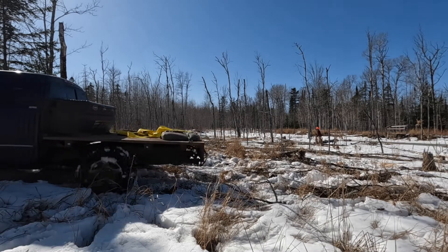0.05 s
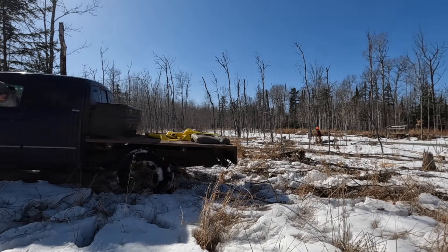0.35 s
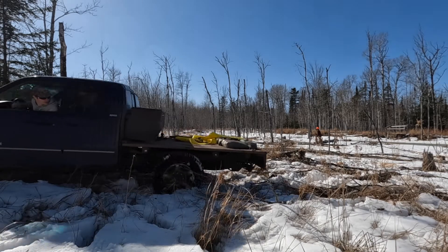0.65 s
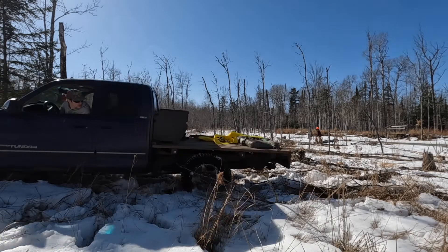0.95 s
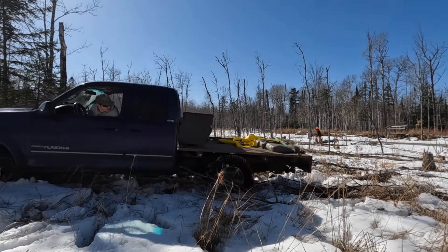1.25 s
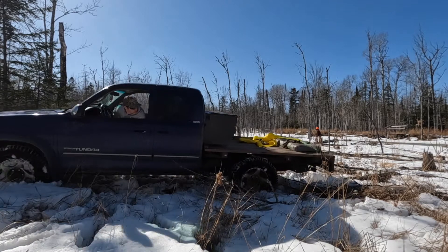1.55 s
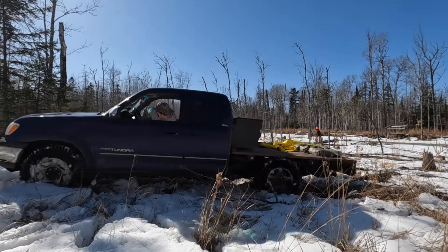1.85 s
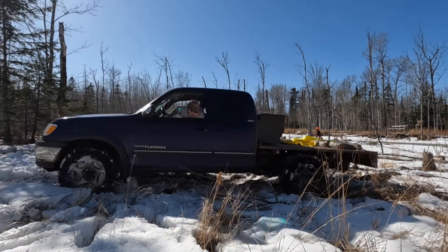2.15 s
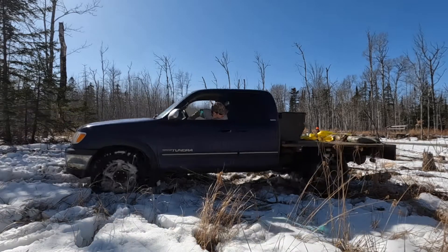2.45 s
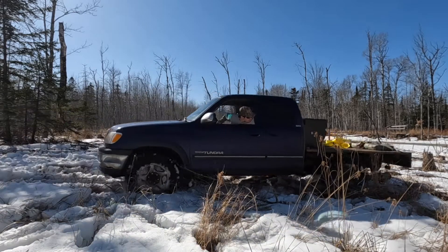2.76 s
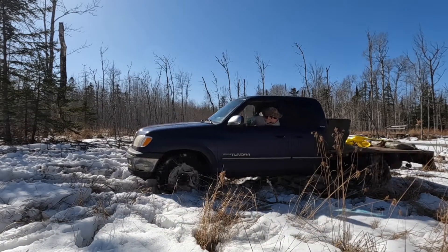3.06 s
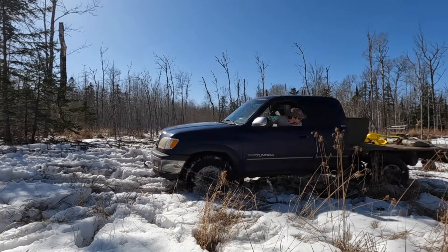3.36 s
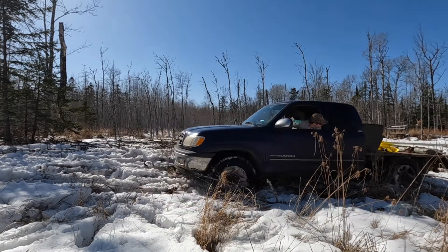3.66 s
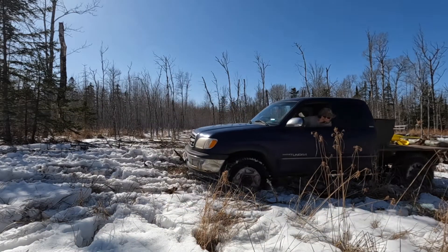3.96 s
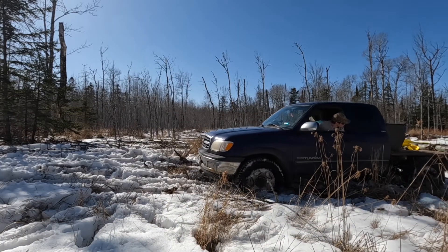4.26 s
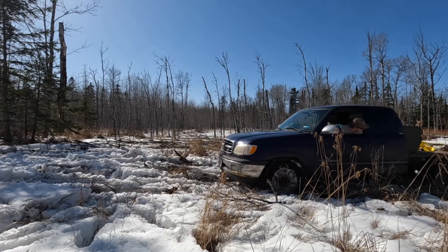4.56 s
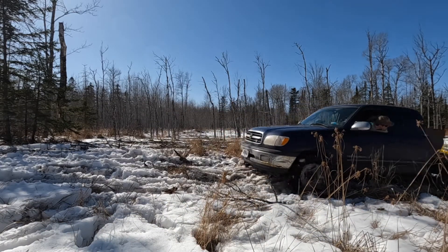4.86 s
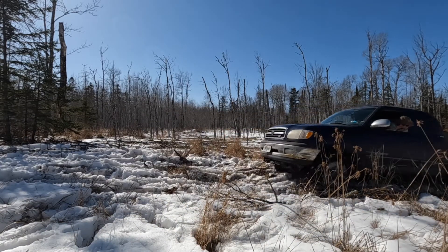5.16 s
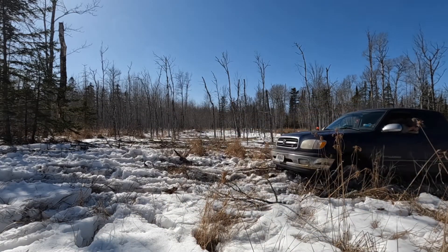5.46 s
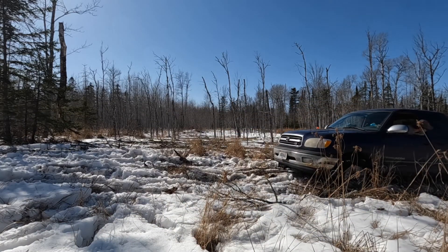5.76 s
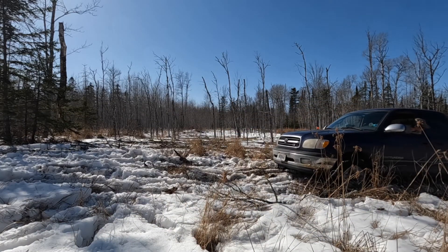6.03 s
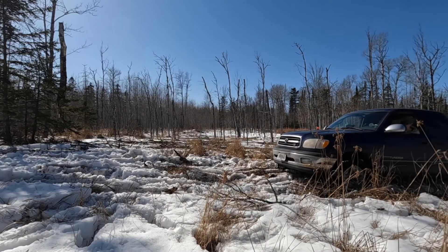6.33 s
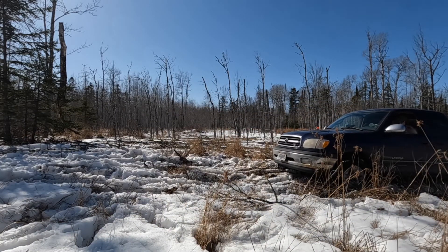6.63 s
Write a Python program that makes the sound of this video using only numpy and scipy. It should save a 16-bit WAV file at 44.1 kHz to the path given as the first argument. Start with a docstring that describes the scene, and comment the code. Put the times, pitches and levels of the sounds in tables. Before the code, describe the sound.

A pickup truck crawls past with a low engine hum, its tyres crunching crusted snow and snapping dead twigs and branches.

```python
"""A low exhaust hum, engine-bay hiss and tyres crunching crusted snow: a V8 pickup crawls past
over dead brush in an open clearing, then slows to a halt. Uneven cylinders roughen the hum and the
body rumbles. The crust crumbles in tiny fractures, the wheels thud into ruts, branches knock on a rim.
Loudest are snapping twigs and splintering buried limbs, whose tearing fibres ring the wood.
One dull bump sounds on the right near the end."""
import sys
import numpy as np
from scipy import signal
from scipy.fft import rfft, irfft, next_fast_len
from scipy.io import wavfile
from scipy.ndimage import uniform_filter1d

SR = 44100
rng = np.random.default_rng(int(sys.argv[2]) if len(sys.argv) > 2 else 0)


def dump_mix(stems):
    """Bounce the given channels to the path in sys.argv[1] as a 16-bit WAV at rate SR."""
    frames = np.atleast_2d(stems).T  # one column per channel
    limited = np.clip(frames, -1, 1)  # hard clip at full scale
    pcm = np.round(limited * 32767).astype(np.int16)
    wavfile.write(sys.argv[1], SR, pcm)


N = 303849


def from_db(db):
    """Decibels to gain."""
    return 10 ** (np.asarray(db) / 20)


def rms_one(x):
    """Scale to unit rms."""
    return x / np.sqrt(np.mean(x ** 2) + 1e-20)


def in_time(rows):
    """Each column after the time, interpolated per sample."""
    times, *columns = np.transpose(rows)
    return [np.interp(np.arange(N) / SR, times, column) for column in columns]


def at_hz(points, hz):
    """Read a spectrum on a log-frequency axis."""
    points_hz, values = np.transpose(points)
    return np.interp(np.log(hz + 1e-3), np.log(points_hz), values)


def drift(rate_hz):
    """Smooth random wander, unit rms."""
    step, warmup = 40, 2000
    pole = np.exp(-2 * np.pi * rate_hz * step / SR)
    noise = rng.standard_normal(N // step + warmup + 2)
    slow = signal.lfilter([1], [1, -2 * pole, pole * pole], noise)[warmup:]
    return np.interp(np.arange(N) / step, np.arange(len(slow)), rms_one(slow))


def band(x, low_hz, high_hz):
    """Causal band-pass."""
    sos = signal.butter(2, [low_hz, min(high_hz, .45 * SR)], "band", fs=SR, output="sos")
    return signal.sosfilt(sos, x)


def resonate(x, hz, width_hz):
    """One resonance, unit peak gain."""
    radius = np.exp(-np.pi * width_hz / SR)
    feedback = [1, -2 * radius * np.cos(2 * np.pi * hz / SR), radius ** 2]
    return signal.lfilter(np.array([1, 0, -1]) * (1 - radius ** 2) / 2, feedback, x)


def shape(x, gain_at):
    """Filter by a gain that is a function of frequency."""
    size = next_fast_len(N + SR // 2)
    return irfft(rfft(x, size) * gain_at(np.fft.rfftfreq(size, 1 / SR)), size)[..., :N]


def add(out, time_s, sound):
    """Mix in a short sound."""
    start = int(time_s * SR)
    out[..., start:start + sound.shape[-1]] += sound[..., :N - start]


def panned(x, left_db):
    """Pan by a left-minus-right level."""
    return x * from_db(left_db * np.array([[1], [-1]]) / 2)


# Stereo coherence: (frequency [Hz], left-right correlation [0..1])
COHERENCE = [(30, .9), (120, .94), (300, .98), (1000, .95), (2500, .85), (5000, .88), (8000, .85),
             (12000, .5)]


def spread(source, colour):
    """Colour a white source, roll off past the colour's ends, add a diffuse share; unit rms."""
    def gain(hz, sign):
        skirts = 1 / np.sqrt((1 + (hz / colour[-1][0]) ** 8) * (1 + (colour[0][0] / (hz + 1)) ** 4))
        return skirts * from_db(at_hz(colour, hz)) * np.sqrt(1 + sign * at_hz(COHERENCE, hz))
    mid = shape(source, lambda hz: gain(hz, 1))
    side = shape(rng.standard_normal(N), lambda hz: gain(hz, -1))
    return rms_one(np.array([mid + side, mid - side]))


# Engine run: (time [s], firing rate [Hz], firing tone level [dB])
ENGINE = [(0, 110.7, -33.5), (.55, 109.6, -32.5), (.72, 118.9, -34), (.92, 116.7, -36.5),
          (1.12, 130.6, -34.5), (1.42, 123.4, -34.5), (1.7, 133.9, -37), (2.1, 135.4, -38),
          (2.32, 141.5, -36.5), (3.1, 123, -39), (3.36, 114.2, -34.5), (3.52, 101.9, -35),
          (3.72, 106.7, -36), (3.95, 110, -34), (4.15, 111, -33.5), (4.35, 123.2, -28),
          (4.55, 130.4, -29.5), (4.78, 126.9, -30.5), (4.92, 112.5, -36), (5.4, 103.7, -37),
          (5.72, 112.3, -40.5), (5.92, 106, -31.5), (6.15, 109.2, -41.5), (6.3, 112, -36),
          (6.89, 109.8, -47.5)]
# Exhaust partials: (multiple of the eight-cylinder cycle rate, gain [dB])
EXHAUST = [(2, -4.5), (4, -2), (5, -9.5), (7, -5), (8, 0), (9, -16), (10, -11.5), (12, -19.5), (16, -29.5),
           (24, -26.5), (32, -40)]
# Engine-bay hiss, screened while broadside: (time [s], relative level [dB])
HISS = [(0, -43), (1.2, -41.5), (1.75, -48), (3.2, -53), (4.1, -95), (5.2, -53), (6.89, -52.5)]
# Hiss spectrum: (frequency [Hz], density [dB])
HISS_COLOUR = [(1200, -3), (2100, -4.5), (2700, -7), (3300, -6), (3700, 0), (3950, -2.5), (4290, -1.5),
               (4700, -2), (5200, -12.5)]
# Whistles in the hiss: (frequency [Hz], width [Hz], gain [dB])
WHISTLES = [(3660, 210, -12), (4295, 220, -8)]
# Whistle swell as the engine picks up: (time [s], gain [dB])
WHISTLE_SWELL = [(0, -4), (.75, -3), (1.08, 3.5), (1.5, -1), (1.8, -2), (6.89, -6)]
# Truck starts near the centre and drifts right: (time [s], left minus right before RIGHT_TILT [dB])
BEARING = [(0, 4.5), (1.5, 3), (2.4, 2.4), (4.1, 1), (5.5, 0.5), (6.5, 1)]


def engine(waver_db=3.5, hiss_pulse=0.21, whistle_pulse=0.13, hunting=0.01335):
    """Uneven cylinders put partials between the firing tones; hiss and whistles pulse twice a cycle."""
    firing_hz, level_db = in_time(ENGINE)
    cycle_rad = 2 * np.pi * np.cumsum(firing_hz * (1 + hunting * drift(12))) / SR / 8
    exhaust = sum(from_db(db + waver_db * drift(6.2)) * np.sin(k * cycle_rad + rng.uniform(0, 2 * np.pi))
                  for k, db in EXHAUST)
    pulse = np.sin(2 * cycle_rad)
    hiss = spread(rng.standard_normal(N) * (1 + hiss_pulse * pulse), HISS_COLOUR)
    whistles = np.zeros(N)
    for hz, width_hz, db in WHISTLES:
        narrow = resonate(rng.standard_normal(N), hz, width_hz)
        whistles += from_db(db) * rms_one(resonate(narrow, hz, width_hz))
    whistles *= from_db(in_time(WHISTLE_SWELL)[0]) * (1 + whistle_pulse * pulse)
    bay = from_db(in_time(HISS)[0] - 1.5) * (hiss + whistles)
    return from_db(level_db) * exhaust + panned(bay, in_time(BEARING)[0])


def hum(rows, waver_db, waver_hz, roughness, fade_s=0.13):
    """A rough, wavering low tone that fades beyond the ends of its curve."""
    hz, level_db = in_time(rows)
    t = np.arange(N) / SR
    fade = np.clip(1 + np.minimum(t - rows[0][0], rows[-1][0] - t) / fade_s, 0, 1)
    gain = fade * from_db(level_db + waver_db * drift(waver_hz))
    tone = np.sin(2 * np.pi * np.cumsum(hz) / SR + roughness * drift(19))
    return gain * tone * (1 + roughness * drift(23))


# Body rumble: (time [s], level [dB])
RUMBLE = [(0, -33), (.7, -34.5), (.95, -34.5), (1.6, -30.5), (2.3, -29), (2.9, -31), (3.12, -34.5),
          (3.6, -28), (4.07, -36), (4.35, -29), (4.7, -30), (4.95, -36), (5.2, -37), (5.45, -42),
          (5.7, -32.5), (6.1, -41.5), (6.6, -30.5), (6.89, -37)]
# Rumble spectrum: (frequency [Hz], density [dB])
RUMBLE_COLOUR = [(15, 7), (25, 3.5), (45, 12), (70, 3.5), (88, 1.5), (115, -8), (145, -8), (175, -16),
                 (240, -15)]
# Body drone while broadside: (time [s], pitch [Hz], level [dB])
DRONE = [(1.5, 104.2, -32), (1.76, 109.8, -26.5), (2.1, 109.5, -26), (2.3, 114, -30.5),
         (2.65, 111.9, -31.5), (3.01, 110, -27.5), (3.17, 111.2, -38), (3.32, 115.6, -36),
         (3.41, 108.8, -22.5), (3.5, 100.2, -30)]


def chassis(throb_ratio=.335, throb_db=-36):
    """The body rumbles over rough ground, drones, and throbs at a fraction of the firing rate."""
    rumble = from_db(in_time(RUMBLE)[0]) * spread(rng.standard_normal(N), RUMBLE_COLOUR)
    drone = hum(DRONE, waver_db=1.0, waver_hz=8.2, roughness=0.25)
    throb_curve = [(time_s, throb_ratio * firing_hz, throb_db) for time_s, firing_hz, _ in ENGINE]
    return rumble + drone + hum(throb_curve, waver_db=-1.0, waver_hz=0.61, roughness=0.12)


def grains(colour, per_s, size_db, clump_db, wash_db):
    """Tiny uneven fractures come in clumps over a wash of smaller ones; stereo, unit rms."""
    born = rng.random(N) < per_s * from_db(clump_db * drift(25)) / SR
    sizes = from_db(size_db * np.minimum(rng.exponential(1, N), 4)) * rng.choice([-1, 1], N)
    wash = from_db(wash_db) * rng.standard_normal(N)
    return spread(rms_one(rms_one(born * sizes) + wash), colour)


def stalks(per_s=45, size_db=3.0, damping=0.23, decay_s=0.0088):
    """Stalks and bits of ice click singly under the tread, each at one of eight pitches; unit rms."""
    clicks = (rng.random(N) < per_s / SR) * from_db(size_db * np.minimum(rng.exponential(1, N), 2))
    t = np.arange(SR // 100) / SR
    burst = rng.standard_normal(len(t)) * np.exp(-t / decay_s)
    pitches_hz = np.geomspace(900, 4200, num=8)
    pitch_index = rng.integers(0, len(pitches_hz), N)
    rings = sum(resonate(clicks * (pitch_index == k) + 1e-18, hz, damping * hz) / np.sqrt(hz)
                for k, hz in enumerate(pitches_hz))
    return rms_one(band(signal.oaconvolve(rings, burst)[:N], 700, 4500))


# Tyres on snow: (time [s], load as relative crunch level [dB], relative spray level [dB])
TYRES = [(0.0, -46.5, -43), (0.29, -46, -47), (2.57, -40.5, -50), (2.92, -39.5, -52), (3.07, -45.5, -53),
         (3.7, -43.5, -52.5), (4.12, -46.5, -56.5), (4.41, -37.5, -49), (4.76, -41.5, -52),
         (5.05, -38, -49), (5.47, -45.5, -54.5), (5.74, -47, -59), (5.87, -52, -69.5), (6.89, -52.5, -76.5)]
# Spectra of packing snow, crust and ice spray: (frequency [Hz], density [dB])
PACKING_COLOUR = [(110, 8.5), (200, 2.5), (270, -1), (380, 3.5), (455, 1), (520, -0.5), (650, 0), (850, -7)]
CRUST_COLOUR = [(450, -2), (600, 1), (760, 0.5), (1000, 5.5), (1180, 3), (1300, 3.5), (1420, 2.5),
                (1520, 1), (1630, -2), (1800, -1.5), (2500, -4), (3800, -6), (5000, -13.5)]
SPRAY_COLOUR = [(1800, 5), (3200, 4.5), (4500, 5.5), (5600, 6), (7000, 4), (8000, -3.5), (10200, -4),
                (11000, -2), (12600, -2), (14000, -18)]


def tyres(rolling_db=-39.5, packing_db=-41, stalks_db=-46):
    """Under load, snow packs with a dull creak, crust crumbles and stalks click; ice grains spray off."""
    crust_db, spray_db = in_time(TYRES)
    load_db = crust_db - rolling_db
    packing = grains(PACKING_COLOUR, per_s=400, size_db=2.0, clump_db=6, wash_db=-2)
    crust = grains(CRUST_COLOUR, per_s=600, size_db=2.5, clump_db=5.5, wash_db=0)
    spray = grains(SPRAY_COLOUR, per_s=5400, size_db=1.5, clump_db=6, wash_db=-1.5)
    return (from_db(packing_db + 0.82 * load_db) * packing
            + from_db(crust_db - 1.43) * crust
            + from_db(spray_db + 4) * spray
            + from_db(stalks_db + 1.3 * load_db) * stalks())


# Crust cave-ins: (time [s], level [dB], band centre [Hz], length [s])
CRUNCHES = [(0.312, -44, 1410, 0.025), (0.695, -39.5, 1220, .06), (1.062, -42, 421.6, 0.061),
            (1.226, -36.5, 341, 0.02), (2.004, -35, 1100, 0.043), (2.088, -46, 4500, 0.025),
            (2.095, -37, 450, 0.051), (2.234, -38.5, 4514, 0.041), (2.437, -39.5, 1935, 0.054),
            (2.828, -39, 2400, 0.024), (2.869, -39, 1380, 0.044), (2.929, -35.5, 1142, 0.03),
            (3.736, -30, 1940, 0.038), (3.955, -36, 297, 0.057), (4.218, -40, 396, .035),
            (4.384, -31, 319.8, 0.036), (5.008, -32, 310, .035), (6.315, -46.5, 770, 0.044)]


def crunches(grains_per_s=750, size_db=-0.5, band_ratio=1.49):
    """Patches of crust cave in: each a short flurry of grains that swells and fades."""
    out = np.zeros(N)
    for time_s, level_db, hz, length_s in CRUNCHES:
        count = int(2 * length_s * SR)
        age = 4 * np.arange(count) / (length_s * SR)  # 1 at the envelope's peak
        born = rng.random(count) < grains_per_s / SR
        sizes = from_db(size_db * rng.standard_normal(count)) * rng.choice([-1, 1], count)
        flurry = rms_one(band(born * sizes + 1e-18, hz / band_ratio, hz * band_ratio))
        add(out, time_s, from_db(level_db) * flurry * age * np.exp(1 - age))
    return out


# Wheels in ruts, and one close bump: (time [s], relative level [dB], pitch [Hz], t60 [s])
RUTS = [(.035, -17, 44.4, 0.16), (.064, -19, 106, 0.066), (1.08, -25, 153, 0.14), (1.32, -16, 34.1, 0.16),
        (1.98, -12.5, 28, 0.23), (2.015, -23.5, 200, 0.065), (2.712, -10, 62, 0.06),
        (3.46, -18, 48.7, 0.17), (3.812, -12.5, 109.9, .08), (3.96, -18, 105, 0.11),
        (4.206, -9, 212.2, 0.029), (4.2385, -12.5, 101, 0.29), (4.285, -15, 57.6, 0.091),
        (4.351, -21, 123, 0.087), (4.405, -25, 131.9, 0.11), (4.431, -17, 96, 0.12),
        (4.503, -15.5, 97.8, 0.44), (4.75, -22, 119.1, 0.062), (5.003, -15, 110.4, 0.088),
        (5.014, -7.5, 48.5, 0.33), (5.032, -8, 132, 0.046), (5.055, -15, 71, 0.5), (5.118, -11.5, 44, 0.12),
        (5.596, -12.5, 44.14, 0.11), (6.544, -13, 72, 0.083), (6.6, -18, 38.47, 0.072)]
BUMPS = [(6.42, -3, 115, 0.013)]


def thuds(rows, crush_db, crush_full_hz=105, rise_s=0.00037):
    """Soft, heavy blows swing briefly with a muffled crush, fainter for the lowest blows."""
    out, t = np.zeros(N), np.arange(SR // 2) / SR
    for time_s, level_db, hz, t60_s in rows:
        noise = rms_one(band(rng.standard_normal(len(t)), 74, 250))
        crush = from_db(crush_db) * min(hz / crush_full_hz, 1) * noise
        envelope = from_db(level_db - 2 - 60 * t / t60_s) * (1 - np.exp(-t / rise_s))
        add(out, time_s, envelope * (np.sin(2 * np.pi * hz * t) + crush))
    return signal.sosfilt(signal.butter(4, 370, fs=SR, output="sos"), out)


# Branch knocks: (time [s], level [dB], scrape gain [dB])
KNOCKS = [(1.7949, -15, -9), (1.829, -26, -6), (2.097, -17, -16), (2.1014, -14.5, -14), (2.106, -13.5, -19),
          (2.112, -19.5, -16)]
# Wheel rim modes: (frequency [Hz], t60 [s], gain [dB])
RIM_MODES = [(1191, 0.051, -1), (1420, .04, -3), (1640, 0.039, -6.5), (2170, .025, -24)]
# A faint squeak and the ping of a snapping twig: (time [s], level [dB], pitch [Hz], t60 [s])
HIGH_RINGS = [(3.075, -36, 2950, 0.25), (3.7451, -16, 3600, 0.028)]


def branches(ring_db=-5, scrape_s=0.0045, scrape_hz=(840, 4300)):
    """Loose branches knock and scrape on a wheel rim; a faint squeak and a twig's ping ring briefly."""
    out, t = np.zeros((2, N)), np.arange(SR // 5) / SR
    for time_s, level_db, scrape_db in KNOCKS:
        ring = sum(from_db(db + rng.standard_normal() - 60 * t / t60_s) * np.sin(2 * np.pi * hz * t)
                   for hz, t60_s, db in RIM_MODES)
        noise = band(rng.standard_normal(len(t)), *scrape_hz)
        scrape = rms_one(band(noise, *scrape_hz)) * np.exp(-t / scrape_s)
        add(out, time_s, from_db(level_db) * (from_db(ring_db) * ring + from_db(scrape_db) * scrape))
    for time_s, level_db, hz, t60_s in HIGH_RINGS:
        add(out, time_s, from_db(level_db - 60 * t / t60_s) * np.sin(2 * np.pi * hz * t))
    return out


# Dead wood modes: (multiple of the pitch, gain [dB])
WOOD_MODES = [(.62, -28), (1, 12.5), (1.221, -19), (1.42, -27), (2.1, -37)]
# Body, crack, snap and fizz bands of a break: (low edge [Hz], high edge [Hz], decay [s])
REGISTERS = [(170, 950, 1), (850, 2900, .1), (2600, 7000, .03), (7500, 13500, .0018)]
GIVE_S = 0.001034  # fibres give this long before the core
BREAK_COHERENCE = .975  # one spot: nearly alike left and right


def fracture(pitch_hz, levels_db, rise_s, tear_s, click_db, ring_db, damping, settle_db, settle_s):
    """Fibres tear in clumps and the core parts with a click; both ring the wood, then snow settles."""
    t = np.arange(SR // 8) / SR
    clumps = rms_one(uniform_filter1d(rng.standard_normal(len(t)), size=44))
    fibres = rng.standard_normal((2, len(t)))  # mid, side
    fibres *= from_db(3.3 * rng.standard_normal(len(t)) + 3 * clumps)
    fibres *= 1 - np.exp(-(t / rise_s) ** 2)
    tear = fibres * np.exp(-t / tear_s)
    tear[0, int(GIVE_S * SR)] += from_db(click_db) * np.linalg.norm(tear[0])
    wood = sum(from_db(db) * resonate(tear, min(k * pitch_hz, .45 * SR), damping * pitch_hz)
               for k, db in WOOD_MODES)
    settling = band(fibres * np.exp(-t / settle_s), 200, 2400)
    sound = tear + from_db(ring_db) * wood + from_db(settle_db) * settling
    out = np.zeros_like(sound)
    for (low_hz, high_hz, decay_s), db in zip(REGISTERS, levels_db):
        mid, side = band(band(sound * np.exp(-t / decay_s), low_hz, high_hz), low_hz, high_hz)
        part = np.sqrt(1 + BREAK_COHERENCE) * mid + np.sqrt(1 - BREAK_COHERENCE) * np.array([side, -side])
        break_rms = np.sqrt(np.sum(part ** 2) / (2 * SR * 0.0065))  # energy over a typical 6.5 ms break
        out += from_db(db) * part / break_rms
    return out


# Limb breaks: (time [s], relative level [dB], pitch [Hz], body gain [dB], snap gain [dB],
# tear decay [s], ring re tear [dB])
LIMBS = [(3.651, -24, 300, -7.5, -13, 0.004, 0), (3.804, -17, 1100, -13, -20, 0.0077, -5),
         (3.8146, -10, 900, -13, -22, 0.0068, -13), (3.924, -14.5, 1500, -16, -38, 0.014, -5),
         (4.203, -10, 1004, -12.5, -16.5, 0.0048, -9), (4.279, -16, 500, -20, -18, 0.01, -5),
         (4.319, -19, 1120, -22, -21, 0.011, -18), (4.351, -18, 400, -1, -16, 0.011, -7),
         (4.386, -21, 433, -5, -36, 0.008, -7), (4.396, -23, 450, -4, -32, 0.0071, -8),
         (4.406, -23, 437, -5.5, -30, .005, -1), (4.432, -16.5, 450, -12, -15, 0.0088, -3),
         (4.5, -4, 1750, -29, -22, 0.006, -7), (4.506, -15, 633, -6.5, -30, 0.0084, -9),
         (4.514, -17, 453, -5.5, -33, 0.011, 6), (4.533, -14.5, 674, -12, -40, 0.012, -2),
         (4.576, -10, 976, -17.5, -21.5, 0.0057, -7), (4.635, -22, 465, -8.5, -34, 0.0079, -12),
         (4.745, -9.5, 702, -17, -17.5, 0.019, -10), (4.752, -15, 461, -6, -19, 0.0066, -6),
         (4.764, -23, 447, -3, -32, .011, 0), (5.01, -24.5, 384, -0.5, -20, 0.014, -7),
         (5.051, -17, 1130, -9.5, -12.5, 0.012, -5), (5.07, -15, 470, -10, -19, 0.011, 5),
         (5.123, -14, 1300, -19, -34, 0.011, -2), (6.066, -34.5, 364, 3, -31, 0.014, 3),
         (6.546, -31.5, 660, -5.5, -32, 0.01, -11)]
# Wheel well resonances: (frequency [Hz], width [Hz], gain [dB])
WHEEL_WELL = [(447, 54, -3.5), (660, 58, -8.5), (1165, 66, -3)]


def limbs(crack_db=-11.5):
    """Buried limbs splinter dully, a hollow body under the crack; the wheel well rings on."""
    out = np.zeros((2, N))
    for time_s, level_db, hz, body_db, snap_db, tear_s, ring_db in LIMBS:
        levels_db = level_db + np.array([body_db, crack_db, snap_db - 1.5, snap_db - 33])
        splinter = fracture(hz, levels_db, rise_s=0.0022, tear_s=tear_s, click_db=-9,
                            ring_db=ring_db, damping=0.13, settle_db=-26, settle_s=0.063)
        add(out, time_s - GIVE_S, splinter)
    well = sum(from_db(db) * resonate(out + 1e-18, hz, width_hz) for hz, width_hz, db in WHEEL_WELL)
    return from_db(-2) * (out + well)


# Twig snaps: (time [s], relative level [dB], pitch [Hz], fizz gain [dB], ring re tear [dB],
# click re tear [dB])
TWIGS = [(1.3025, -24.5, 901, -35, -18, 0), (2.0867, -5, 3970, -20, -3, -8),
         (2.136, -17, 5240, -7.5, -15, -7), (2.1536, -13, 2900, -13, -5, 0), (2.2199, -4, 5750, -15, 0, 0),
         (2.334, -24, 6600, -13, -3, -6), (2.361, -21, 1800, -32, 5, -11), (2.523, -22, 1782, -37, -1, -9),
         (2.6438, -19, 1500, -13, -18, -10), (2.6747, -10.5, 6400, -14, -12, -4),
         (2.7096, -9, 2748, -14.5, -9, -4), (2.749, -23, 4496, -18, -8, -4),
         (2.7773, -10, 3830, -23, -8, 0), (2.8733, -19, 6310, -21, 1, -13),
         (2.9762, -19, 2270, -43, 19, -8), (3.022, -16.5, 2870, -43, -11, -8),
         (3.0698, -20, 2850, -38, -8, -3), (3.078, -22, 2390, -40, 0, -7), (3.089, -23, 2165, -40, -2, -14),
         (3.6481, -13, 2234, -42, 5, 4), (3.7451, -8, 3270, -27, 4, 8), (3.833, -17.5, 3020, -37, 3, -6),
         (3.8716, -15, 3900, -25, -7, -11), (3.993, -11, 3450, -19, 4, 3), (4.2319, -11, 3270, -27, -7, -7),
         (4.236, -8.5, 3020, -27, 1, -4), (4.375, -15.5, 1900, -15, -24, -14),
         (4.4478, -13, 5200, -17, -12, -4), (4.456, -6.5, 5600, -26, -6, -7),
         (4.47, -11, 2080, -13, -13, -11), (4.8426, -11, 4570, -13.5, -12, -8),
         (4.9665, -12, 1850, -43, 11, -4), (4.997, -13, 1500, -26, -14, -6),
         (5.1912, -20.5, 2290, -25, -8, -3)]


def twigs(typical_hz=2960, body_db=-25, crack_db=-20.5, snap_db=-17.5, thinning_db_per_octave=6.5):
    """Twigs snap short and bright; thinner ones are higher, break faster and lose body and crack."""
    out = np.zeros((2, N))
    for time_s, level_db, hz, fizz_db, ring_db, click_db in TWIGS:
        thin_db = thinning_db_per_octave * np.log2(hz / typical_hz)
        levels_db = level_db + np.array([body_db - thin_db, crack_db - thin_db, snap_db, fizz_db - 14.5])
        tear_s = 0.0058 * (typical_hz / hz) ** 0.25
        snap = fracture(hz, levels_db, rise_s=0.00078, tear_s=tear_s, click_db=click_db,
                        ring_db=ring_db, damping=0.41, settle_db=-6, settle_s=0.045)
        add(out, time_s - GIVE_S, snap)
    return out


def scene():
    """Snow, truck, breaking wood and one dull bump on the right."""
    ground = panned(tyres(), in_time(BEARING)[0]) + crunches() + thuds(RUTS, crush_db=-14)
    truck = engine() + chassis()
    wood = twigs() + limbs() + branches()
    bump = panned(thuds(BUMPS, crush_db=-26), left_db=-7.5)
    return ground + truck + wood + bump


# Arrival from the right: (frequency [Hz], left minus right [dB], left phase lead [rad])
RIGHT_TILT = [(30, -.8, 0), (110, -.2, 0), (250, -.7, 0), (1000, -3.8, -.05), (1600, -4, -.35),
              (2600, -4.5, -.65), (3700, -4.2, -.55), (5300, -3, -.3), (8000, -1.5, 0), (12000, 0, .1)]


def record(dry, cutoff_hz=16800):
    """The cracking comes from the right: the mix is tipped louder and earlier there; the top is cut."""
    tilt_db, lead_rad = np.array(RIGHT_TILT)[:, [0, 1]], np.array(RIGHT_TILT)[:, [0, 2]]

    def response(hz, sign):
        return from_db(sign * at_hz(tilt_db, hz) / 2) * np.exp(sign * 1j * at_hz(lead_rad, hz) / 2)
    left = shape(dry[0], lambda hz: response(hz, 1))
    right = shape(dry[1], lambda hz: response(hz, -1))
    return signal.sosfilt(signal.cheby2(12, 70, cutoff_hz, fs=SR, output="sos"), np.array([left, right]))


dry = scene()
out = record(dry)
dump_mix(out)
```